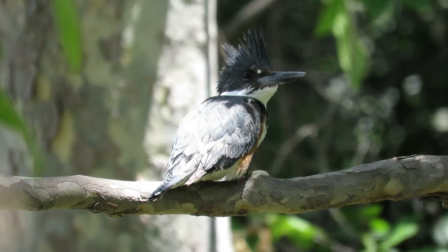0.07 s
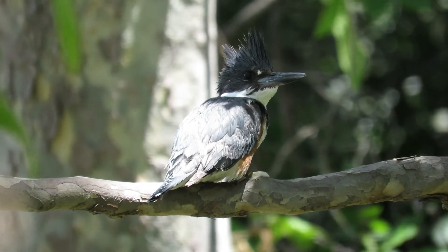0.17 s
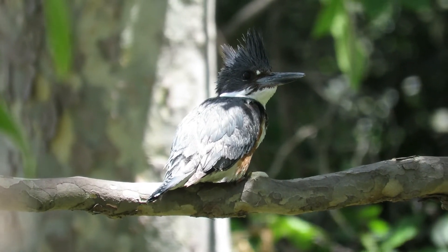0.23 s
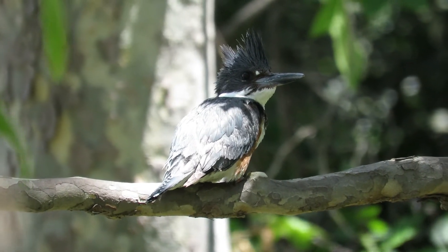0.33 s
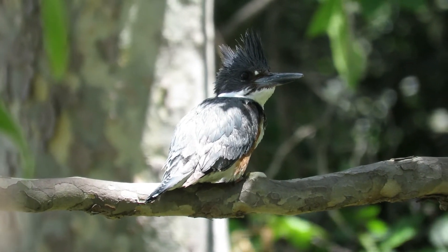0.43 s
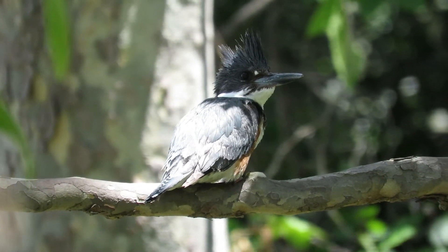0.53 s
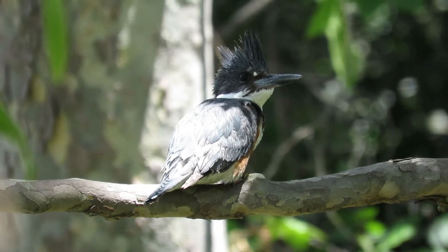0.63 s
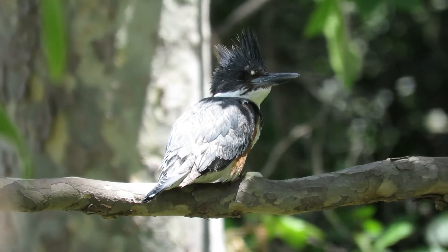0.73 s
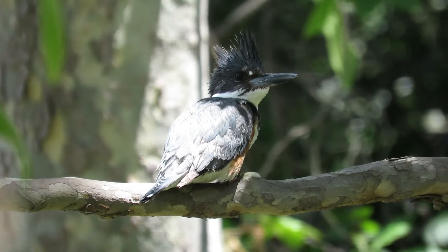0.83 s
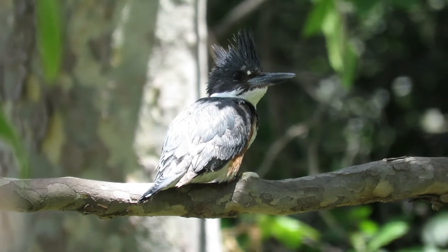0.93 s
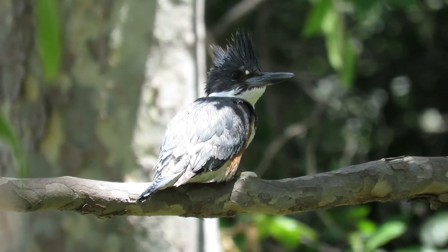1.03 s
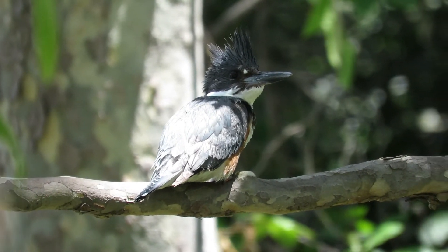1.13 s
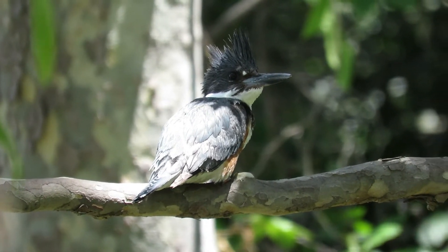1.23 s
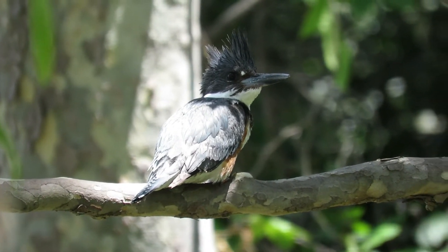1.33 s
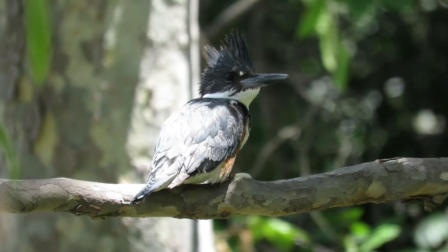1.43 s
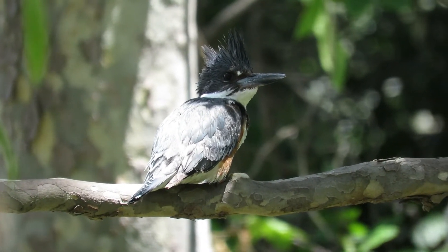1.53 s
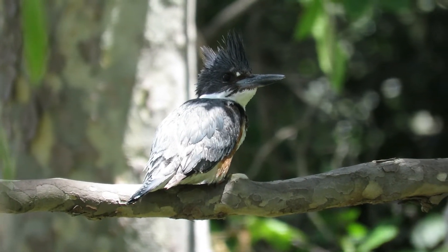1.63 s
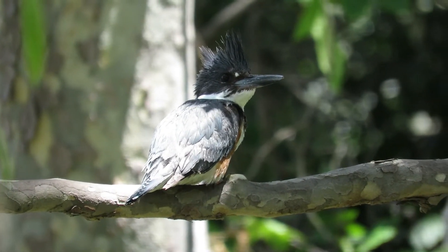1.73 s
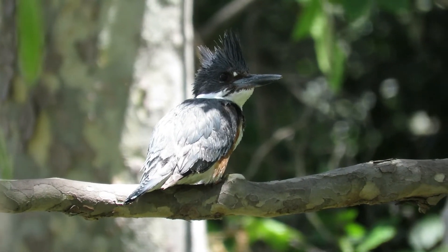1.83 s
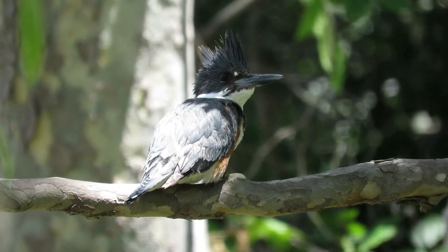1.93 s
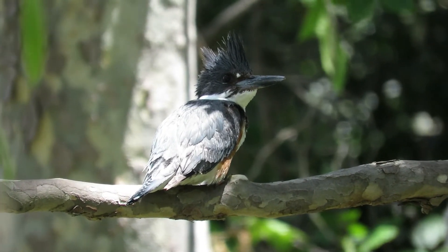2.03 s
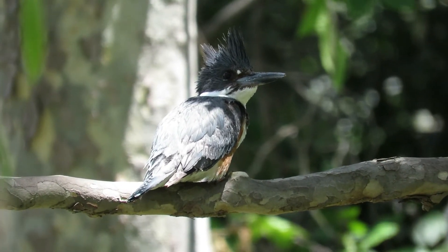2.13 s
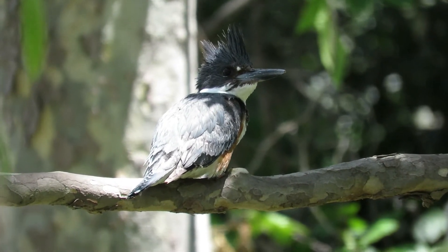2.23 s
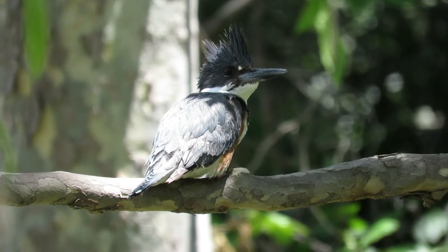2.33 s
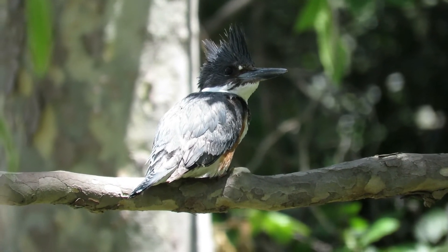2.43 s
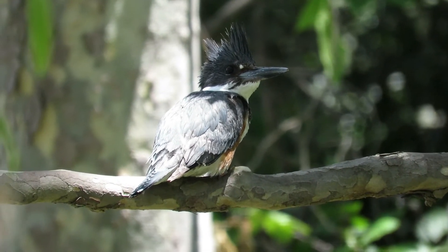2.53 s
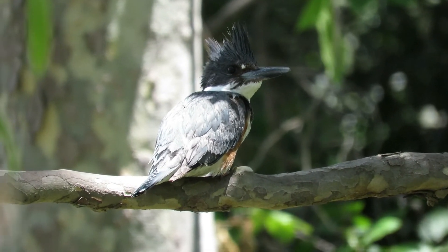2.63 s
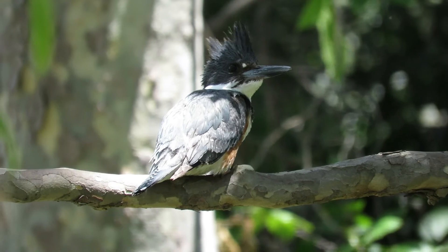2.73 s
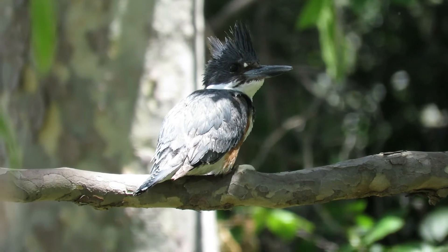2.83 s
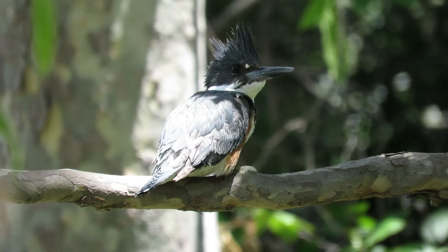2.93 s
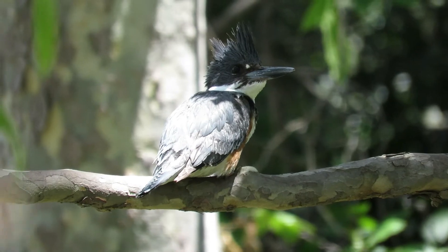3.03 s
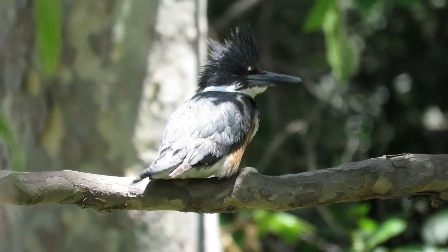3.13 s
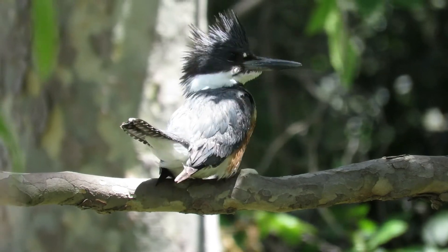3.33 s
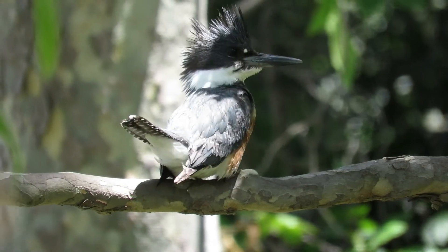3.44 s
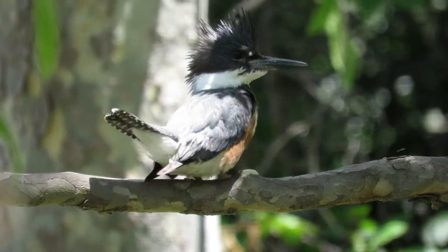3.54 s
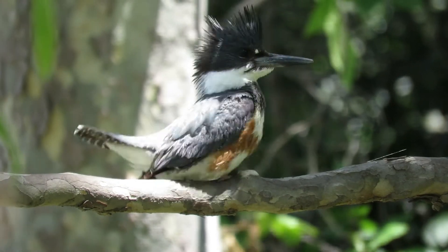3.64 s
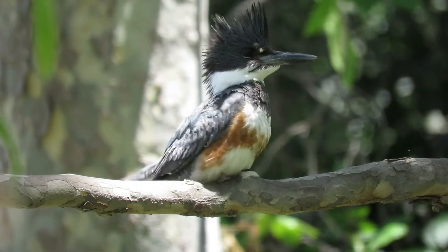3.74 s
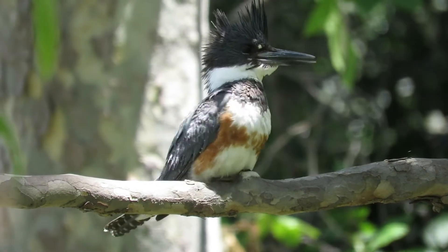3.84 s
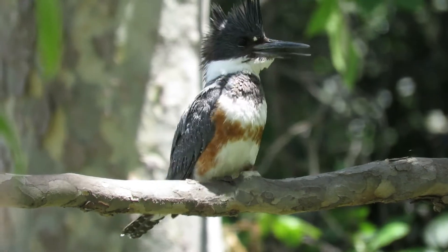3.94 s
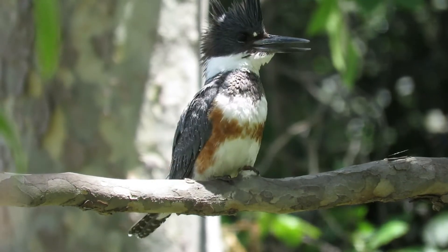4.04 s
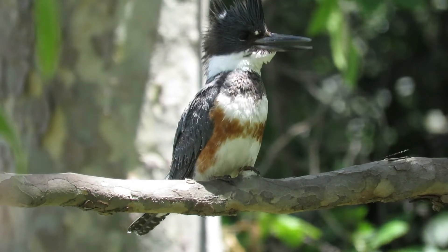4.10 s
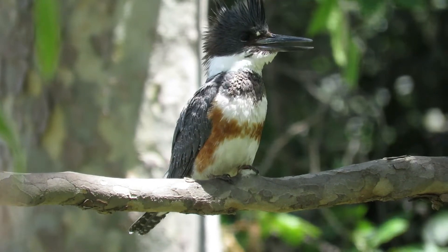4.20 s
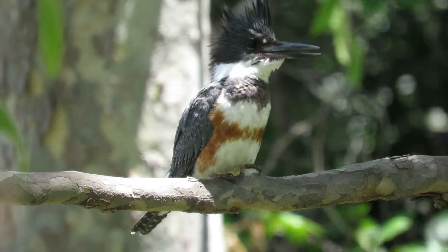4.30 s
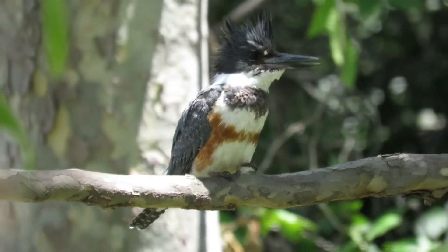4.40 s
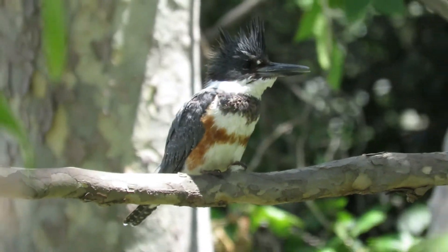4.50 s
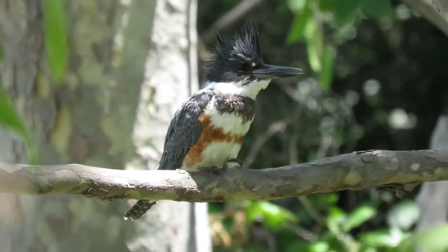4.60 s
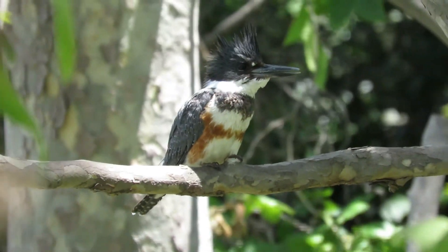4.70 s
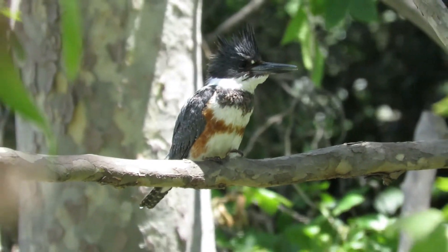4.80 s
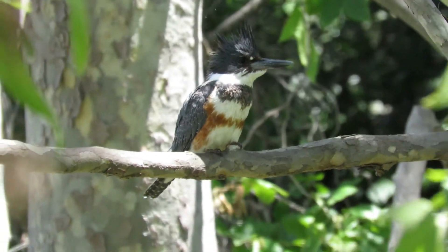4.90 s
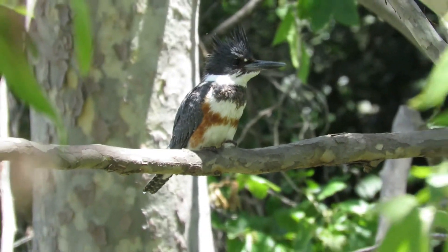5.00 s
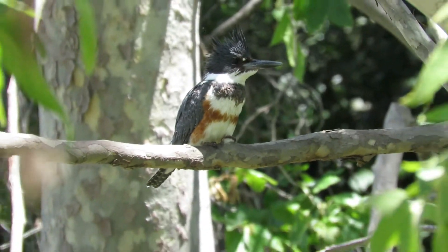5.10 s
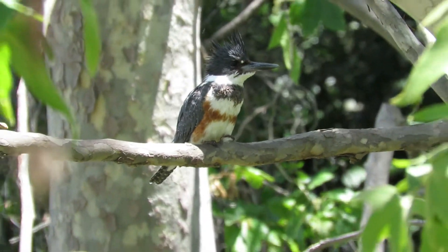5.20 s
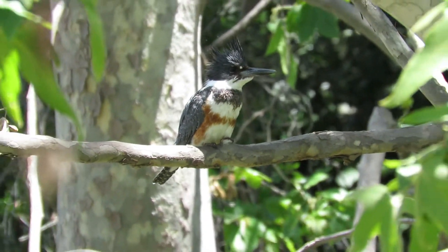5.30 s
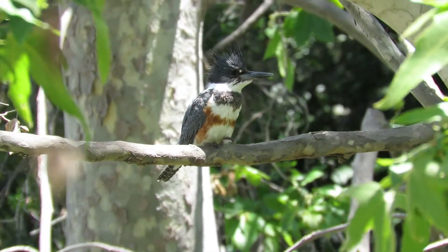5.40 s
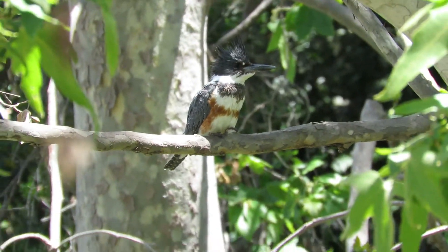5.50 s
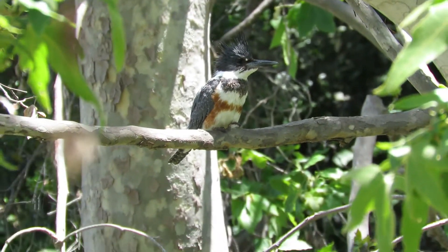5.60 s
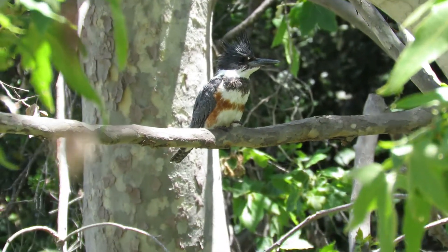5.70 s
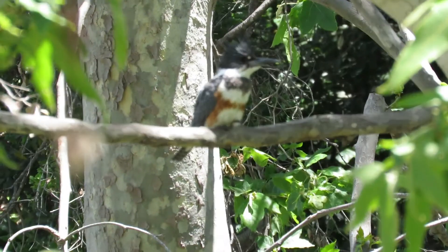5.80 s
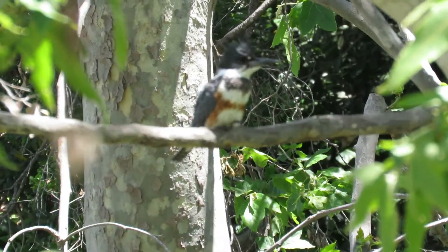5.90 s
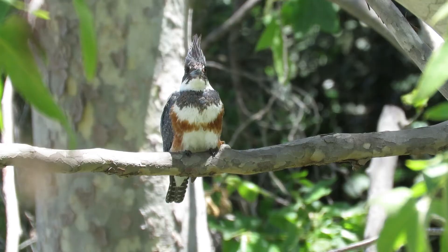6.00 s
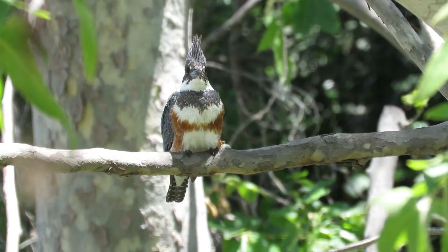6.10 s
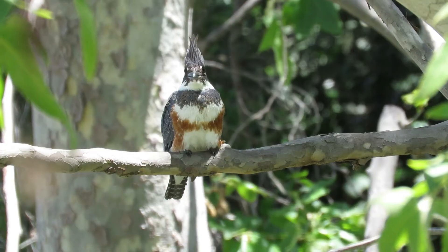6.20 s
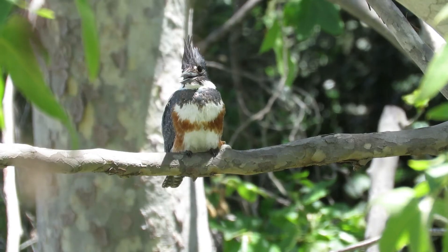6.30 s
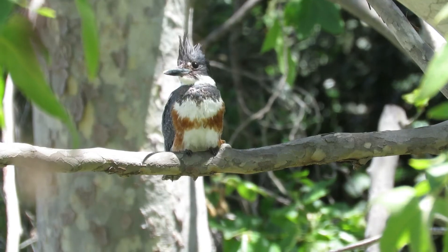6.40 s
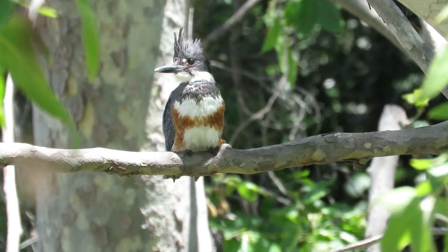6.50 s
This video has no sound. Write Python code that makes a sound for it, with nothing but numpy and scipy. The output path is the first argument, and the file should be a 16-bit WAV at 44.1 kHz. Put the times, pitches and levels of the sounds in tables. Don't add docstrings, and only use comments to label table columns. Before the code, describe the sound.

Dry chattering rattles from a perched kingfisher echo softly among trees, with thin far whistles, a brief buzz and small handling clicks.

```python
import sys
import numpy as np
from scipy import signal
from scipy.fft import rfft, irfft, next_fast_len
from scipy.io import wavfile
from scipy.ndimage import uniform_filter1d

SR = 44100
rng = np.random.default_rng(int(sys.argv[2]) if len(sys.argv) > 2 else 0)


def unload_audio(sound):
    columns = np.transpose(np.atleast_2d(sound))
    steps = np.round(np.clip(columns, -1, 1) * 32767)
    wavfile.write(sys.argv[1], SR, steps.astype(np.int16))


def gain_from_decibels(decibels):
    exponent = np.asarray(decibels, float) / 20
    return 10 ** exponent


N = 288855


def at_hz(points, hz):
    table_hz, values = np.transpose(points)
    return np.interp(np.log(hz), np.log(table_hz), values)


def rms_one(x):
    return x / np.sqrt(np.mean(x ** 2) + 1e-20)


def smooth_noise(size, hz):
    lowpass = signal.butter(2, hz, fs=SR, output="sos")
    settled = signal.sosfilt(lowpass, rng.standard_normal(size + 3000))[3000:]
    return rms_one(settled)


def add(out, sound, s):
    i = round(s * SR)
    sound = sound[max(-i, 0):N - i]
    out[max(i, 0):max(i, 0) + len(sound)] += sound


def air():
    # f/Hz, level/dB; then the overall level/dB
    air_colour, air_db = [(15, -36), (25, -10), (122, -4), (148, -5.5), (233, -6), (322, -6.5), (349, -3),
                          (389, -12), (1750, -14.5), (3170, -23.5), (3930, -27.5), (4620, -25),
                          (6210, -27.5), (15500, -36)], -41.5
    # f/Hz, side minus mid level/dB
    air_spread = [(60, -41), (110, -14), (200, -6.5), (380, -1), (700, -3), (1290, -9.5), (2380, -8),
                  (4400, -7), (8120, -8.5), (15000, -10.5)]
    # f/Hz, width/Hz, level/dB
    motor_lines = [(56.5, 6.8, -55), (93.7, 12.7, -50.5), (120.4, 4.4, -50.5), (236.3, 12.7, -53.5),
                   (358.5, 12, -56), (974, 27, -64.5)]
    hz = np.maximum(np.arange(N // 2 + 1) * SR / N, 1)
    colour = gain_from_decibels(at_hz(air_colour, hz))
    spread = [np.ones_like(hz), gain_from_decibels(at_hz(air_spread, hz))]
    mid, side = irfft(rfft(rng.standard_normal((2, N))) * colour * spread, N)
    flutter_db = 0.43 * smooth_noise(N, hz=3.9)
    scale = gain_from_decibels(air_db - 3.0 + flutter_db) / mid.std()
    motors = np.zeros(N)
    for line_hz, line_width, db in motor_lines:
        resonance = signal.iirpeak(line_hz, line_hz / line_width, SR)
        motors += gain_from_decibels(db) * rms_one(signal.lfilter(*resonance, rng.standard_normal(N)))
    return scale * (mid + side * [[1], [-1]]) + motors


def songbirds():
    # delay t/s, length t/s, from f/Hz, to f/Hz, level/dB
    phrase_parts = [
        (0.00062, .07, 3450, 4300, 2.5),
        (.06, 0.108, 4070, 3970, -6),
        (.055, 0.087, 5150, 5300, -4),
    ]
    # t/s, level/dB, pitch ratio
    phrase_times = [
        (1.72, -49.5, 1.01),
        (2.075, -51.5, 1.05),
        (2.36, -51.5, 1.02),
        (4.592, -48.5, .98),
    ]
    # t/s, level/dB, from f/Hz, to f/Hz
    chips = [
        (1.951, -45, 5600, 6890),
        (4.16, -60, 5450, 6160),
        (4.586, -47, 3320, 3460),
        (4.74, -55, 4100, 3940),
        (4.93, -57, 6150, 6500),
        (5.022, -55, 4160, 3950),
        (5.11, -59, 6150, 6450),
        (5.2, -54.5, 4200, 3750),
    ]
    # t/s, length t/s, from f/Hz, to f/Hz, level/dB
    whistles = [
        (0.999, 0.78, 3440, 3380, -58),
        (1.04, 0.2, 5220, 5190, -63),
        (1.388, .13, 4330, 4180, -56),
        (1.478, .072, 6360, 5900, -49.5),
        (1.977, .11, 6760, 6760, -56),
        (2.026, 0.14, 8020, 7650, -59),
        (2.11, .3, 7770, 7970, -61.5),
        (2.266, .12, 6360, 6400, -57),
        (2.384, 0.11, 8050, 8000, -59),
        (3.96, .15, 6420, 6170, -66),
    ]
    burrs = [
        (1.58, .11, 6040, 6180, -55.5),
        (2.43, 0.12, 5820, 5730, -53.5),
        (4.468, .09, 4080, 3780, -56),
    ]
    thin_hz, slur_hz, burry_hz = 55, 95, 334
    notes = []
    for s, db, ratio in phrase_times:
        for k, (delay, length, from_hz, to_hz, part_db) in enumerate(phrase_parts):
            blur_hz = burry_hz if k else slur_hz
            notes.append((s + delay, length, ratio * from_hz, ratio * to_hz, db + part_db, blur_hz))
    chip_s = .037
    notes += [(s, chip_s, from_hz, to_hz, db, thin_hz) for s, db, from_hz, to_hz in chips]
    notes += [(*row, thin_hz) for row in whistles]
    notes += [(*row, burry_hz) for row in burrs]
    out = np.zeros(N)
    for s, length, from_hz, to_hz, db, blur_hz in notes:
        size = round(length * SR)
        phase = 2 * np.pi * np.cumsum(np.linspace(from_hz, to_hz, size)) / SR
        smear = (0.67 + smooth_noise(size, blur_hz)) * np.sin(phase)
        smear += smooth_noise(size, blur_hz) * np.cos(phase)
        add(out, gain_from_decibels(db) * smear * np.hanning(size) ** .5, s)
    return out


def buzzer():
    # t/s, lowest f/Hz, sweep depth f/Hz, level/dB
    buzz_path = [
        (.66, 5100, 1890, -62),
        (0.679, 5610, 1900, -38.5),
        (0.719, 6230, 1900, -38.5),
        (0.749, 5620, 2086, -35.5),
        (.78, 5180, 2170, -42),
        (.81, 4700, 2020, -48),
        (.83, 4600, 2000, -60),
    ]
    s, *columns = np.transpose(buzz_path)
    t = np.arange(s[0], s[-1], 1 / SR)
    low_hz, depth_hz, db = (np.interp(t, s, c) for c in columns)
    up = .5 - .5 * np.tanh(2.2 * np.cos(2 * np.pi * 130.0 * (t - .6818)) + .5)
    whistle = np.sqrt(2) * np.sin(2 * np.pi * np.cumsum(low_hz + depth_hz * up) / SR)
    sweep_db = -3.0 * up - 22 * up * (1 - up)
    out = np.zeros(N)
    add(out, gain_from_decibels(db + sweep_db) * whistle, s[0])
    return out


def camera():
    # t/s, peak level/dB, f/Hz, time to fade by 60 dB t/s
    knocks = [
        (1.09, -33, 750, .03),
        (2.78, -32, 268, 0.071),
        (2.886, -34, 826, 0.14),
        (4.146, -28.5, 266, 0.046),
        (4.433, -28.5, 357, 0.048),
        (4.445, -27, 298, 0.016),
        (4.453, -27, 398, 0.038),
        (5.709, -20, 1650, 0.0053),
        (5.7114, -16, 1320, 0.0049),
        (5.7147, -17, 1460, 0.012),
    ]
    # t/s, level/dB, length t/s, top f/Hz
    ticks = [
        (0.786, -40, 0.005, 10000),
        (0.843, -45, 0.011, 10000),
        (.882, -38, .004, 10700),
        (0.972, -42.5, 0.0093, 10900),
        (1.404, -46.5, 0.041, 11000),
        (1.866, -41.5, 0.023, 8950),
        (1.896, -43, 0.092, 8400),
        (2.117, -46, 0.05, 13000),
        (2.388, -46, 0.039, 13000),
        (2.432, -46, .03, 9000),
    ]
    out, t = np.zeros(N), np.arange(4000) / SR
    for s, db, hz, t60 in knocks:
        strike = np.minimum(t / 0.00034, 1)
        add(out, gain_from_decibels(db - 60 * t / t60) * strike * np.sin(2 * np.pi * hz * t), s)
    for s, db, length, top_hz in ticks:
        bright = signal.butter(2, [3500, top_hz], "band", fs=SR, output="sos")
        rustle = rng.standard_normal(len(t)) * np.exp(-(t / length) ** 2)
        add(out, gain_from_decibels(db) * signal.sosfilt(bright, rustle), s)
    return out


def trees(x, t60, early_t60, early_db):
    # f/Hz, level/dB
    scatter = [(800, 0.5), (1600, 9.5), (2400, 6), (3100, 0.5), (3950, 0), (5000, 2.5), (6500, -0.5),
               (8000, 1), (10000, -0.5)]
    t = np.arange(SR) / SR
    tail = gain_from_decibels(-60 * t / t60) + gain_from_decibels(early_db - 60 * t / early_t60)
    fade = np.minimum(t / 0.00022, 1) * tail
    echoes = rng.standard_normal((2, SR)) * fade / np.sqrt(np.sum(fade ** 2))
    hz = np.maximum(np.arange(SR // 2 + 1), 1)
    mid, side = irfft(rfft(echoes) * gain_from_decibels(at_hz(scatter, hz)), SR)[:, :SR * 3 // 4]
    return signal.fftconvolve(x[None], mid + gain_from_decibels(-54.5) * side * [[1], [-1]], axes=1)[:, :N]


def note_pitch(ms, second_hz, hold_ms, stage, falling):
    held = 1.015 - 0.05 * stage ** 2
    dropped = .33 + (1 - .33) * np.exp(-falling / .42)
    pitch = second_hz / 2 * np.where(ms < hold_ms, held, dropped)
    return pitch * (1 + 0.037 * np.sqrt(falling) * smooth_noise(len(ms), hz=930))


def note_wave(pitch, falling, slack, tilted, away):
    # f/Hz, level/dB
    voice_colour = [(700, -34), (1400, -41.5), (2000, -30), (2600, -9), (3300, -7), (4000, -4.5),
                    (5000, -8.5), (6000, -9), (7000, -9.5), (8000, -8), (8800, -24), (10300, -30.5),
                    (11500, -36), (14000, -41)]
    # f/Hz, level/dB
    tilt_colour, away_colour = [(800, 29.5), (1400, 18), (2100, 16.5), (2600, 7), (3200, 5.5), (4000, -1.2),
                                (5000, -3), (6200, -4), (8000, -6), (10300, 14), (13000, 7)], [(800, 28), (1400, 20), (2000, 5), (2500, 2.5), (3200, 3),
                                                (4000, -1.7), (5000, -4.5), (6500, -3.5), (8000, -6.5),
                                                (10300, -9), (13000, -7)]
    # harmonic number, level/dB
    slack_colour = [(1, 1), (2, 0.5), (3, -2), (4, 0), (5, 1.5), (7, 0), (10, -2.5), (18, -16)]
    k = np.arange(1, 19)[:, None]
    hz = np.minimum(k * pitch, 20000)
    colour = at_hz(voice_colour, hz) + tilted * at_hz(tilt_colour, hz) + away * at_hz(away_colour, hz)
    colour += slack * at_hz(slack_colour, k)
    colour -= (6 * away + 1.2 * tilted) * (1 - slack) * (k > 2)
    colour -= 7 * (1 - tilted) * (1 - slack) * (k > 4)
    colour -= 6 * (falling - 0.3) * (hz > 4500)
    strengths = gain_from_decibels(colour + rng.normal(0, 1.1, k.shape)) * (hz < 15000)
    phase = k * 2 * np.pi * np.cumsum(pitch) / SR + np.pi / 7 * k ** 2
    wave = np.sum(strengths * np.sin(phase), axis=0)
    return wave * (1 + 0.38 * slack * smooth_noise(len(pitch), hz=1110))


def note_level(stage, falling, slack, fall_db):
    crest_db, attack_db, attack_share = 1.67, -18, 0.18
    loudness = crest_db * (1 - slack) + attack_db * np.exp(-stage / attack_share) + fall_db * slack
    break_db, break_share = -1, 0.07
    loudness += break_db * np.exp(-((falling - break_share) / break_share) ** 2) * slack
    for start, loss_db in ((0.29, -7), (0.9, -15)):
        loudness += loss_db * np.maximum(falling - start, 0) / (1 - start)
    return loudness


def kingfisher():
    # t/s, tilted 0-1, turned away 0-1, echo share level/dB
    facing = [
        (.4, 0, 0, -17.5),
        (2.9, 0.94, 0.19, -3),
        (3.05, 0.73, 0, -15),
        (3.3, 0.92, 0.24, -11),
        (3.47, 0.56, 0.36, -20),
        (3.535, 0.21, 0.47, -21),
        (3.61, 0.06, 0.58, -24),
        (5.3, 0.01, 0.79, -4),
        (5.6, 0.07, 0.98, -5),
        (6.1, .18, 0.92, -7.5),
    ]
    # t/s, peak level/dB, second harmonic f/Hz, hold t/ms
    first = [
        (-.0015, -0.5, 3955, 5.3),
        (0.0666, -1, 3920, 4.4),
        (0.1333, -1, 3984, 4.7),
        (0.2042, -1, 3923, 4.46),
        (0.2653, -0.5, 3977, 5.2),
        (0.3369, -1.5, 3935, 4.44),
    ]
    second = [(2.9116, -16.5, 4043, 3.16), (2.9367, -11.5, 4230, 5.3), (2.9663, -14.5, 4150, 4.7),
              (3.0148, -9.5, 4230, 5), (3.044, -8, 4160, 5.3), (3.1035, -11, 4030, 3.7),
              (3.1331, -7, 4160, 4.2), (3.1968, -13, 4077, 6.7), (3.2665, -16.5, 3990, 5.1),
              (3.3319, -16, 3976, 3.3), (3.3986, -13.5, 3920, 3.9), (3.4654, -9, 3874, 5.6),
              (3.5341, -3.5, 3934, 6.6), (3.6064, -0.5, 3870, 5.7)]
    third = [(5.3203, -19.5, 3790, 4.1), (5.3468, -15.5, 4027, 4.6), (5.3981, -18, 3887, 3.8),
             (5.4539, -19.5, 3870, 4.8), (5.5146, -19, 3905, 4.1), (5.5527, -19, 3945, 5),
             (5.6269, -20.5, 3790, 3.4), (5.6936, -22.5, 3697, 4.8), (5.7592, -23, 3755, 4.3),
             (5.8245, -21, 3765, 5.6), (5.893, -21, 3740, 4.7), (5.957, -19, 3760, 5.6),
             (6.027, -17.5, 3765, 5.4)]
    # notes, peak of a note aimed at us level/dB, length of the fall t/ms
    rattles = [(first, 2, 14.8), (second, -1, 15.3), (third, -15, 17)]
    direct, thrown = np.zeros((2, N))
    facing_s, *head = np.transpose(facing)
    calls = [(*note, *shared) for notes, *shared in rattles for note in notes]
    for s, peak_db, second_hz, hold_ms, aimed_db, fall_ms in calls:
        tilted, away, echo_db = (np.interp(s, facing_s, c) for c in head)
        fall_db = -7.5 + 0.56 * (aimed_db - peak_db)
        fall_ms = fall_ms * (1 + .07 * rng.standard_normal())
        ms = np.arange(1500) * 1000 / SR
        falling = np.clip((ms - hold_ms) / fall_ms, 0, 1)
        slack = np.minimum(falling / 0.18, 1)
        stage = np.minimum(ms / hold_ms, 1) + falling
        pitch = note_pitch(ms, second_hz, hold_ms, stage, falling)
        wave = note_wave(pitch, falling, slack, tilted, away)
        loudness = note_level(stage, falling, slack, fall_db)
        note = wave * gain_from_decibels(peak_db + loudness - 5.5) * (falling < 1)
        add(direct, note, s)
        add(direct, note * gain_from_decibels(-21.5 + 9.1 * away), s + .0112)
        spread_db = -5 - .75 * echo_db + 4.5 * away
        add(thrown, note * gain_from_decibels(echo_db + spread_db * slack), s)
    return direct, thrown


def scene():
    direct, thrown = kingfisher()
    buzz, song = buzzer(), songbirds()
    to_trees = thrown + gain_from_decibels(-3.5) * buzz + gain_from_decibels(-2.0) * song
    echoes = trees(to_trees, t60=0.47, early_t60=0.042, early_db=4.5)
    return direct + buzz + gain_from_decibels(-3.0) * song + camera() + echoes + air()


def top_cut(x):
    return signal.sosfilt(signal.butter(12, 15680, fs=SR, output="sos"), x)


def record(dry):
    # f/Hz, width/Hz, level/dB
    port = [(3920, 480, 5), (4600, 380, -9), (5900, 1100, -0.5), (7360, 360, -10), (7900, 550, 1),
            (9740, 390, -17), (9980, 740, 6), (10770, 400, -14), (11400, 310, -6), (12150, 120, 5)]
    for hz, band_hz, db in port:
        dry = dry + (gain_from_decibels(db) - 1) * signal.lfilter(*signal.iirpeak(hz, hz / band_hz, SR), dry)
    dry = signal.sosfilt(signal.butter(6, 14300, fs=SR, output="sos"), dry)
    envelope = np.abs(signal.hilbert(dry[0], next_fast_len(N))[:N])
    height = uniform_filter1d(envelope, size=12) / .62 + 1e-9
    dry = dry / (1 + height ** 4) ** (1 / 4)
    return top_cut(dry)


dry = scene()
out = record(dry)
unload_audio(out)
```